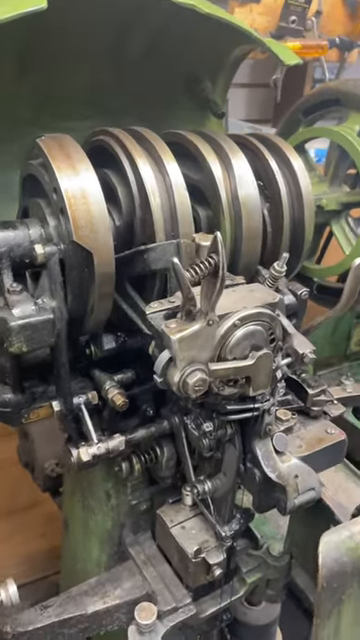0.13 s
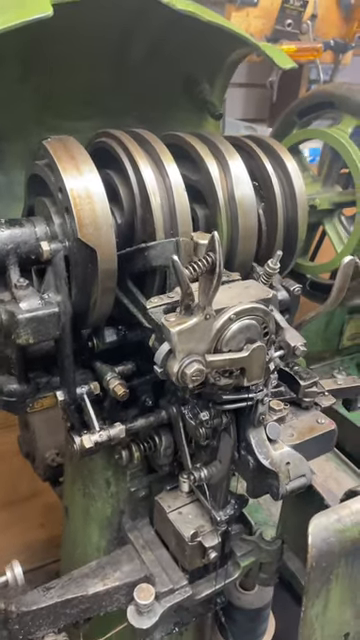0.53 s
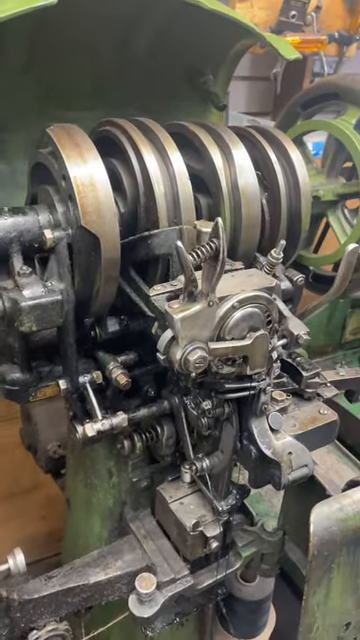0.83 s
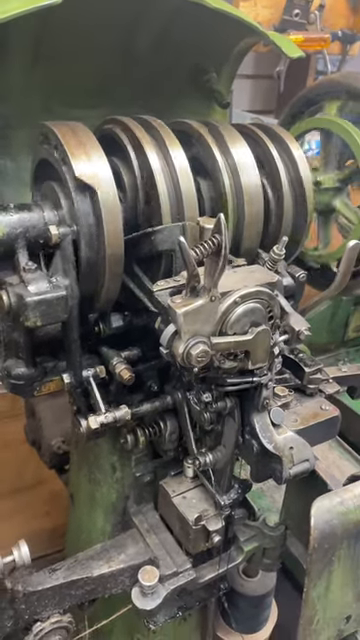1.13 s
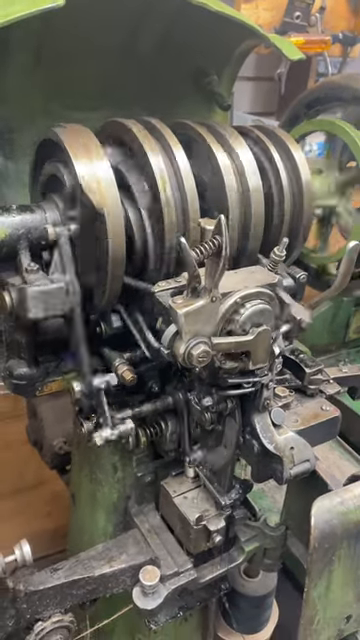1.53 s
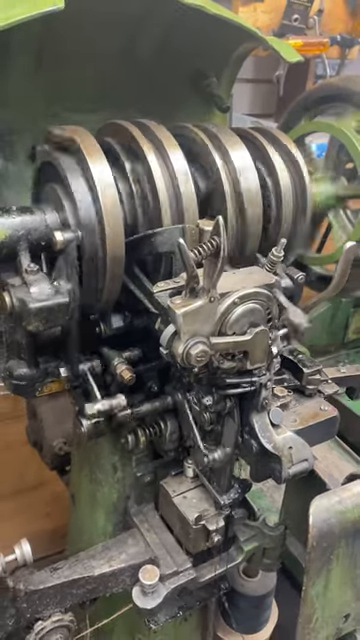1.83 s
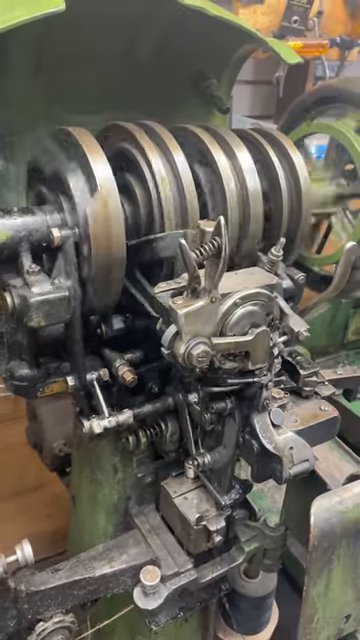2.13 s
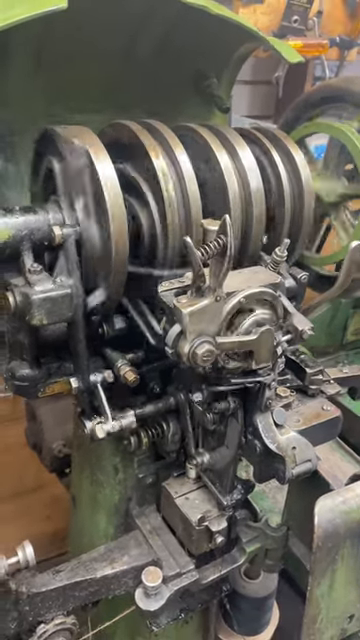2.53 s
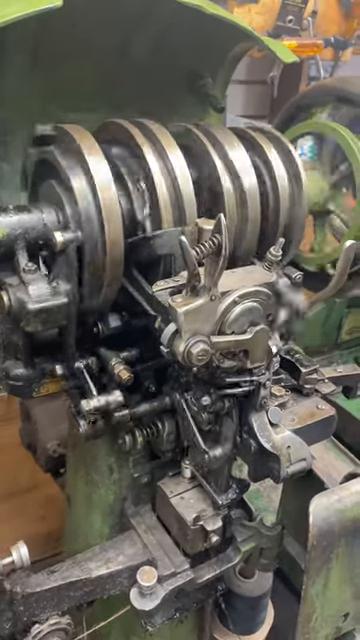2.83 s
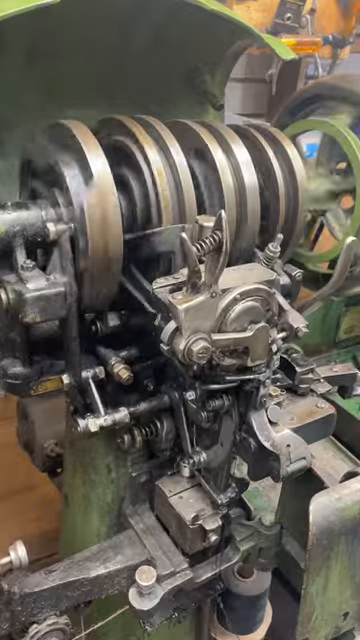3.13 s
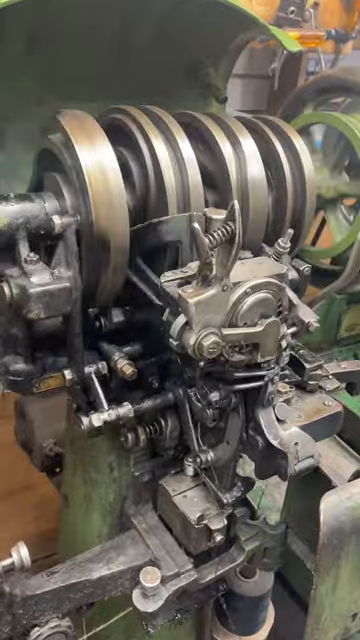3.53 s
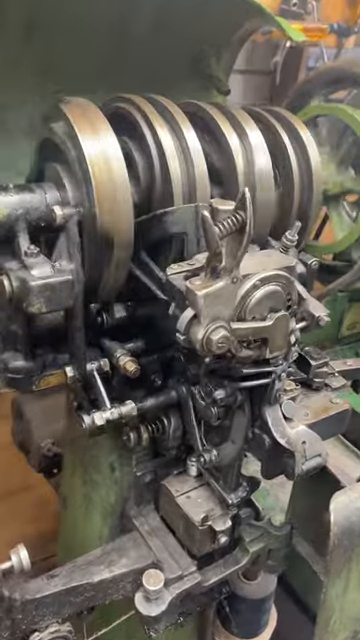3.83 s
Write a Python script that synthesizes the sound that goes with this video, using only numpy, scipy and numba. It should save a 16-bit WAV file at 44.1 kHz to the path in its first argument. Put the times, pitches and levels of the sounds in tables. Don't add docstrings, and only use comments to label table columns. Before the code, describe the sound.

Heavy stitching machine clunks on, whirs, then clacks in an uneven metallic rhythm that speeds up

```python
import sys
import numpy as np
from scipy import signal
from scipy.fft import rfft, irfft
from scipy.io import wavfile
from scipy.ndimage import uniform_filter1d
from numba import njit

SR = 44100
rng = np.random.default_rng(int(sys.argv[2]) if len(sys.argv) > 2 else 0)


def inscribe(sig):
    pcm = np.round(np.clip(np.atleast_2d(sig).T, -1, 1) * 32767)
    wavfile.write(sys.argv[1], SR, pcm.astype(np.int16))


def to_linear_factor(level_db):
    exponent = np.asarray(level_db, float) / 20
    return 10 ** exponent


N = 176400
T = np.arange(N) / SR
HIT = 6000
ATTACK_S = .0017

# start_s, whir level_db
MOTOR_LOAD = [
    (.735, -70),
    (.75, -49),
    (.95, -48),
    (1.15, -43),
    (1.35, -41),
    (2, -36.5),
    (2.95, -37.5),
    (3.3, -32),
    (4, -31.5),
]


@njit
def svf(x, hz, width):
    y, band, low = np.empty(len(x)), 0., 0.
    g, k = np.tan(np.pi * hz / SR), width / hz
    for i in range(len(x)):
        v = (band + g * (x[i] - low)) / (1 + g * (g + k))
        band, low, y[i] = 2 * v - band, low + 2 * g * v, k * v
    return y


def unit(x):
    return x / np.sqrt(np.mean(x ** 2))


def walk(rate):
    k = int(SR / rate)
    held = np.repeat(rng.standard_normal(size=200), k)[:N]
    return 1.3 * uniform_filter1d(uniform_filter1d(held, k), k)


def add(out, s, x):
    i = int(s * SR)
    out[i:i + len(x)] += x[:max(N - i, 0)]


def ring(push, hz, t60):
    pole = np.exp(2j * np.pi * hz / SR - np.log(1000) / (t60 * SR))
    return signal.lfilter([1], [1, -pole], push).imag


def rattle(decay, tail_db=-14):
    t = T[:HIT]
    bumps = rng.standard_normal(size=150).repeat(40)
    fall = np.exp(-t / decay) + to_linear_factor(tail_db) * np.exp(-t / .02)
    shape = fall * (1 - np.exp(-t / ATTACK_S))
    x = rng.standard_normal(HIT) * shape * to_linear_factor(4 * bumps)
    return x / np.sqrt(np.sum(x ** 2))


def bands(points, source, flicker_db):
    hz, db = np.array(points).T
    total = 0
    for centre_hz in 35 * 2 ** np.arange(0, 8.8, .4):
        level_db = np.interp(np.log(centre_hz), np.log(hz), db) + flicker_db * walk(14)
        total = total + to_linear_factor(level_db) * svf(source(), centre_hz, centre_hz / 3)
    return unit(total)


def shop():
    # frequency_hz, level_db
    tone = [(18, -49), (30, -19), (86, -19), (123, 4), (156, -18), (482, -24), (656, -33), (5990, -45),
            (14000, -62)]
    # frequency_hz, level_db
    hum = [(118.4, -54), (479, -62), (2369, -76)]
    # frequency_hz, width_hz, level_db
    far = [(230, 50, -62), (970, 120, -67), (2400, 900, -64), (5400, 500, -70), (11500, 5000, -68)]
    # start_s, level_db
    ticks = [
        (0.0543, -40),
        (0.2319, -44),
        (0.3202, -43),
        (0.4075, -46),
        (0.5372, -48),
    ]
    out = bands(tone, lambda: rng.standard_normal(N), 1.5) * to_linear_factor(-48.5)
    for hz, db in hum:
        phase = 2 * np.pi * np.cumsum(hz + 3 * walk(8)) / SR
        out = out + to_linear_factor(db + 3 + 3 * walk(9)) * np.sin(phase)
    for hz, width, db in far:
        out = out + to_linear_factor(db + 2.5 * walk(7)) * unit(svf(rng.standard_normal(N), hz, width))
    for s, db in ticks:
        tick = svf(rattle(.007), 3200., 4000.)
        add(out, s, to_linear_factor(db) * tick / abs(tick).max())
    return out


def clutch():
    # start_s, level_db
    bounces = [
        (.741, -34),
        (.747, -28),
        (.753, -29),
        (.762, -33),
        (.772, -32),
    ]
    # frequency_hz, level_db, t60_s
    housing = [(318, 0, .06), (436, 0, .06), (472, -7, .07), (1000, -14, .05), (2450, -14, .03),
               (5200, -18, .03)]
    out = np.zeros(N)
    for s, db in bounces:
        push = rattle(.003)
        tap = signal.unit_impulse(len(push))
        blow = 12 * svf(push, 2500., 4000.)
        for hz, mode_db, t60 in housing:
            blow = blow + to_linear_factor(mode_db) * ring(tap if hz < 600 else push, hz, t60)
        add(out, s, to_linear_factor(db) * blow)
    return out


def whir():
    # frequency_hz, level_db_per_hz
    spectrum = [(60, -12), (140, 4), (380, -1), (620, -21), (1300, -9), (2200, -9), (4500, -17),
                (12000, -34)]
    # frequency_hz, width_hz, level_db
    resonances = [(300, 30, -49), (445, 60, -44), (2420, 60, -59), (5000, 4000, -56), (11000, 4500, -52)]
    grains_per_s, spread_db, chatter_db = 300, 2.5, -8
    grains = (rng.random(N) < grains_per_s / SR) * to_linear_factor(spread_db * rng.exponential(size=N))
    chatter = 1 + to_linear_factor(chatter_db) * unit(signal.lfilter([1], [1, -.985], grains))
    load = to_linear_factor(np.interp(T, *np.array(MOTOR_LOAD).T))
    out = bands(spectrum, lambda: rng.standard_normal(N) * chatter, 2.0) * load
    for hz, width, db in resonances:
        waver_db = 3.0 * (width < 100) * walk(12) + 1.2 * walk(10)
        out = out + to_linear_factor(db + waver_db) * unit(svf(rng.standard_normal(N), hz, width))
    return out * (T > MOTOR_LOAD[0][0])


def levers():
    # frequency_hz, level_db
    modes = [(300, 1), (365, 4), (460, 0), (846, -3), (1105, -1), (1492, -3), (1787, -1), (1922, -2),
             (2310, -2), (2959, -4), (4033, -7)]
    taps_per_s, t60_s = 90, .055
    rings = 0
    for hz, db in modes:
        taps = rng.standard_normal(N) * (rng.random(N) < taps_per_s / SR)
        rings = rings + to_linear_factor(db) * ring(taps, hz, t60_s)
    rumble = to_linear_factor(3.5 * walk(12)) * unit(svf(rng.standard_normal(N), 140., 130.))
    load = to_linear_factor(np.interp(T, *np.array(MOTOR_LOAD).T)) * (T > MOTOR_LOAD[0][0])
    return (to_linear_factor(-3.5) * unit(rings) + to_linear_factor(-4) * rumble) * load


def frame():
    # start_s, level_db
    thumps = [(1.229, -24), (1.586, -16), (1.716, -15), (1.821, -18), (1.862, -23), (1.913, -19),
              (2.049, -12), (2.126, -25), (2.168, -13), (2.235, -21), (2.275, -15), (2.372, -19),
              (2.527, -13), (2.659, -16), (2.733, -23), (2.778, -16), (2.885, -26), (3.049, -11),
              (3.125, -25), (3.165, -12), (3.212, -24), (3.257, -13), (3.359, -20), (3.434, -11),
              (3.515, -15), (3.586, -12), (3.647, -18), (3.741, -12), (3.818, -16), (3.89, -15)]
    push_s, t60_s = .008, .062
    out, t = np.zeros(N), T[:HIT]
    shape = np.clip(t / push_s, 0, 1) * to_linear_factor(-60 * np.maximum(t - push_s, 0) / t60_s)
    for s, db in thumps:
        hz = 361 * (1 + .025 * rng.standard_normal())
        low = .45 * np.sin(2 * np.pi * (.8 * hz * t + rng.random()))
        add(out, s - .003, to_linear_factor(db + 1.2) * shape * (np.sin(2 * np.pi * hz * t) + low))
    return out


def passes(angle):
    # time_s, angle_turns
    shaft = [(1.2233, -0.19), (1.3893, -0.005), (1.5887, 0.326), (1.701, 0.564), (1.9695, 1.145),
             (2.2162, 1.705), (2.4848, 2.238), (2.6973, 2.677), (2.951, 3.121), (3.0714, 3.374),
             (3.2727, 3.861), (3.4116, 4.242), (3.5612, 4.757), (3.6309, 4.951), (3.7233, 5.261),
             (3.8655, 5.759), (3.9354, 5.951), (4.0063, 6.2)]
    usual_turns_per_s = 2.1
    s, a = np.array(shaft).T
    at = angle + np.arange(-1, 7)
    at = at[(at > a[0]) & (at < a[-1])]
    half_turn_later = np.interp(at + .5, a, s, right=s[-1] + .1)
    half_turn_before = np.interp(at - .5, a, s, left=s[0] - .3)
    speed = 1 / (half_turn_later - half_turn_before)
    return zip(np.interp(at, a, s), np.log2(speed / usual_turns_per_s))


def force(s, db, speed_db):
    slow_start_db = -8 * (s < 1.3)
    return to_linear_factor(db + speed_db + slow_start_db + 1.0 * rng.standard_normal())


def cams():
    cam_table = {"awl": (0, -13, .006, 3500, 1), "guide": (.111, -19, .011, 4500, 3),
                 "latch": (.261, -13, .003, 4000, 3), "presser": (.317, -20, .005, 2000, 8),
                 "looper": (.371, -18, .007, 2500, 6), "pawl": (.487, -19, .002, 2400, 4),
                 "shuttle": (.5, -17, .006, 4500, 3), "rebound": (.527, -19, .005, 4000, 4),
                 "needle": (.592, -12, .003, 4500, 2), "feed": (.704, -26, .003, 4000, 2),
                 "lock": (.814, -15.5, .004, 3000, 3), "spring": (.903, -24, .003, 2500, 9),
                 "takeup": (.951, -16, .003, 5500, 8)}
    lever_modes = {"awl": [(1556, -6, .045), (1800, -4, .06), (4290, -8, .05), (5420, 0, .05)],
                   "guide": [(1230, -6, .07), (3381, -11, .4), (3400, -15, .4), (5491, -6, .06)],
                   "latch": [(2008, -6, .06), (2590, -2, .04), (6600, -4, .04)],
                   "presser": [(1150, -3, .06), (4080, -8, .06)], "looper": [(1922, -2, .05),
                   (2471, -8, .07), (4043, -5, .08)], "pawl": [(2400, 0, .03)], "shuttle": [(4260, 3, .05),
                   (6363, -8, .05)], "rebound": [(4040, 2, .07), (1110, -6, .08)],
                   "needle": [(5130, 0, .04), (3381, -8, .04), (1475, -9, .08)], "feed": [(4340, 2, .06),
                   (1260, -3, .05)], "lock": [(1120, -8, .08), (1809, -5, .06), (2962, -4, .08),
                   (4300, -6, .06), (5448, -8, .06)], "spring": [(1160, -3, .05), (2000, -3, .05)],
                   "takeup": [(6705, 2, .04), (1211, -8, .06)]}
    # start_s, peak level_db, treble_db against the peak
    clear_blows = [(1.2263, -21, -22), (1.35, -17, -19), (1.3944, -10, -26), (1.4562, -18, -10),
                   (1.5505, -13, -14), (1.5845, -17, -18), (1.6099, -17, -21), (1.6708, -14, -20),
                   (1.7147, -7, -27), (1.8164, -10, -14), (1.8583, -18, -17), (1.8798, -12, -15),
                   (1.9017, -7, -18), (1.9546, -16, -11), (2.02, -12, -13), (2.0454, -16, -16),
                   (2.0684, -11, -25), (2.1247, -11, -18), (2.1661, -9, -23), (2.2714, -12, -13),
                   (2.3387, -16, -14), (2.3642, -7, -20), (2.4221, -20, -14), (2.4949, -15, -10),
                   (2.5218, -18, -16), (2.5493, -14, -21), (2.6106, -13, -22), (2.657, -9, -23),
                   (2.7743, -12, -17), (2.8536, -16, -13), (2.8805, -7, -23), (2.9454, -20, -13),
                   (3.0172, -14, -12), (3.0436, -18, -15), (3.0696, -15, -21), (3.124, -10, -22),
                   (3.1619, -7, -24), (3.2068, -20, -21), (3.2532, -12, -14), (3.306, -10, -17),
                   (3.324, -8, -19), (3.3659, -11, -11), (3.4138, -10, -17), (3.4477, -8, -18),
                   (3.4881, -8, -19), (3.5824, -10, -15), (3.6114, -11, -17), (3.6323, -8, -18),
                   (3.7211, -9, -15), (3.7406, -10, -21), (3.7929, -9, -18), (3.8169, -7, -20),
                   (3.8862, -13, -14), (3.9162, -11, -18), (3.9366, -11, -18), (3.9491, -9, -27)]
    snap_s = .009
    out, blows = np.zeros(N), np.array(clear_blows)
    for name, (angle, db, decay, hz, gain_db) in cam_table.items():
        for s, speed in passes(angle):
            gain, treble_db = force(s, db, gain_db * speed), -18
            near = blows[np.argmin(abs(blows[:, 0] - s))]
            if abs(near[0] - s) < snap_s and name not in ("pawl", "rebound"):
                s, gain, treble_db = near[0] - ATTACK_S / 2, to_linear_factor(near[1] - 4), near[2]
            push, strike, body = rattle(decay), rattle(decay, tail_db=-24), rattle(2.0 * decay)
            crack = svf(push, hz, 1.3 * hz)
            crack = crack + to_linear_factor(treble_db + 10) * svf(push, 10500., 7000.)
            crack = crack + to_linear_factor(-1) * svf(body, 1500., 2000.)
            crack = crack * np.sqrt(decay * SR / 2)
            rings = 0
            for mode_hz, mode_db, t60 in lever_modes[name]:
                level = to_linear_factor(mode_db + 2.5 * rng.standard_normal())
                struck_hz = mode_hz * (1 + .006 * rng.standard_normal())
                rings = rings + level * ring(strike, struck_hz, .62 * t60)
            add(out, s, gain * (to_linear_factor(14) * crack / 3 + to_linear_factor(-2) * rings))
    return out


def room(x):
    size, t60_s = 15000, .22
    t = T[:size]
    decay = to_linear_factor(-60 * t / t60_s) * np.clip(t / .008, 0, 1)
    shared, apart = (svf(rng.standard_normal(size), 1500., 5000.) * decay for _ in range(2))
    apart = svf(apart - svf(apart, 120., 900.), 1200., 3000.)
    scale = np.sqrt(np.sum(shared ** 2))
    return [signal.fftconvolve(x, h / scale)[:N] for h in (shared, apart)]


def ports(x):
    # frequency_hz, phase lead_rad, level_db
    differences = [(100, 0, -.5), (600, 1.4, 8), (1290, -1, 4), (3270, -1.6, 1), (5200, .1, 0),
                   (7700, 3.1, 0), (11200, 6.3, 0), (14300, 9.3, 0)]
    f = np.arange(N // 2 + 1) * SR / N
    hz, lead, db = np.array(differences).T
    half = to_linear_factor(np.interp(f, hz, db) / 2) * np.exp(.5j * np.interp(f, hz, lead))
    return np.array([irfft(rfft(x) * half, N), irfft(rfft(x) / half, N)])


def nearby(x):
    h = rng.standard_normal((2, 800)) * np.exp(-T[:800] / .004)
    h = np.array([svf(k, 8000., 14000.) for k in h])
    h = h / np.sqrt(np.sum(h[0] ** 2))
    return to_linear_factor(-11) * signal.fftconvolve(x[None], h, axes=1)[:, :N]


def scene():
    dry = cams() + frame() + clutch() + whir() + levers() + shop()
    shared, apart = room(dry)
    opposed = 2.2 * apart * np.array([[1], [-1]])
    return ports(dry + to_linear_factor(-13.5) * shared) + to_linear_factor(-13.5) * opposed + nearby(dry)


def thin(x):
    weak_db, scatter_db, from_hz, attack_db = -3, 2.6, 6500, 3.8
    f, _, z = signal.stft(np.array([x[0] + x[1], x[0] - x[1]]) / 2, SR, nperseg=1024)
    band = np.arange(len(f)) // 16
    numbers = np.unique(band)
    power = uniform_filter1d(np.add.reduceat(abs(z) ** 2, numbers * 16, axis=1), size=3)
    count, frames = power.shape[1:]
    held = rng.standard_normal((count, frames // 3 + 1)).repeat(3, axis=1)[:, :frames]
    keep = power > power[::-1] * to_linear_factor(2 * (weak_db + scatter_db * held))
    loud = power.sum(axis=(0, 1), where=numbers[:, None] > 9)
    keep |= loud > to_linear_factor(2 * attack_db) * np.roll(loud, 2)
    kept = z * (keep[:, band] | (f < from_hz)[:, None])
    mid, side = signal.istft(kept, SR, nperseg=1024)[1][:, :N]
    return np.array([mid + side, mid - side])


def top_cut(x):
    return signal.sosfilt(signal.butter(12, 17110, fs=SR, output="sos"), x)


def record(dry):
    # frequency_hz, level_db
    response = [(28, -15), (50, -1), (6300, -2), (8000, 3), (10500, -2), (13500, -11), (15800, 2),
                (17300, -45)]
    hz, db = np.array(response).T
    f = np.arange(N // 2 + 1) * SR / N
    gain = to_linear_factor(np.interp(np.log(f + 1), np.log(hz), db))
    limited = np.tanh(.9 * irfft(rfft(dry) * gain, N)) / .9
    return top_cut(thin(limited))


dry = scene()
out = record(dry)
inscribe(out)
```